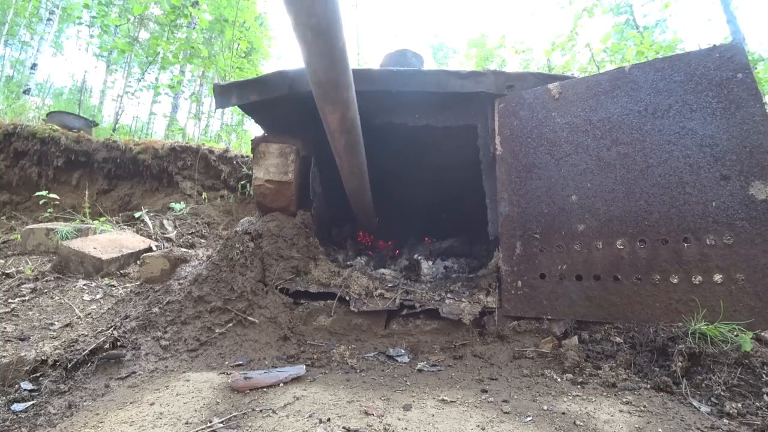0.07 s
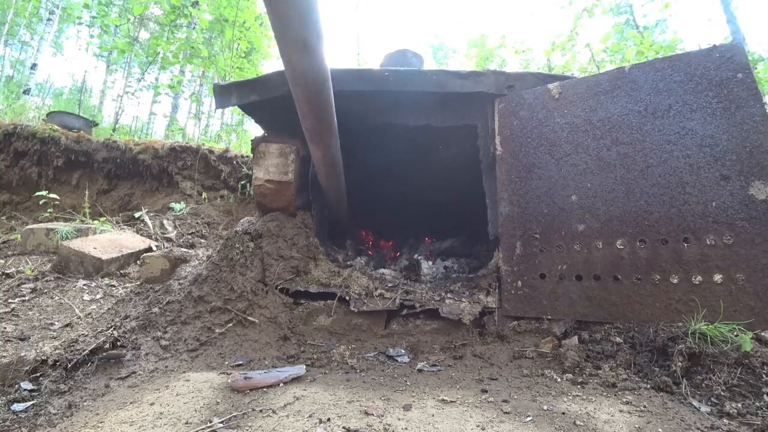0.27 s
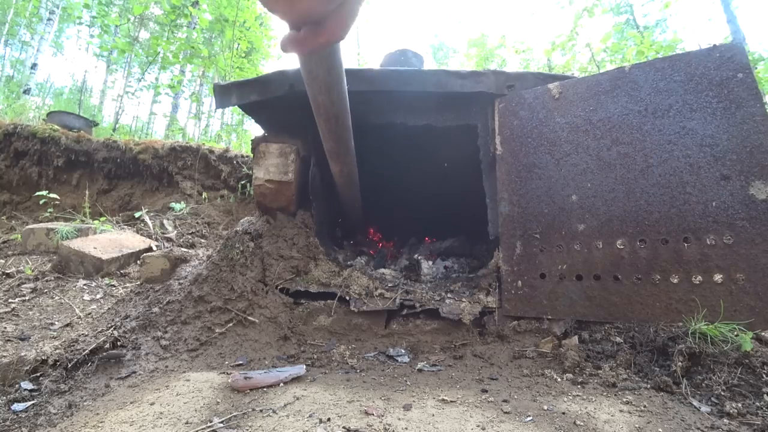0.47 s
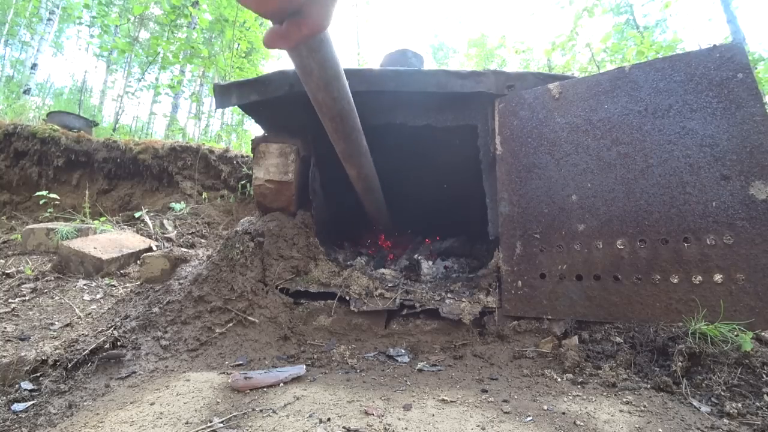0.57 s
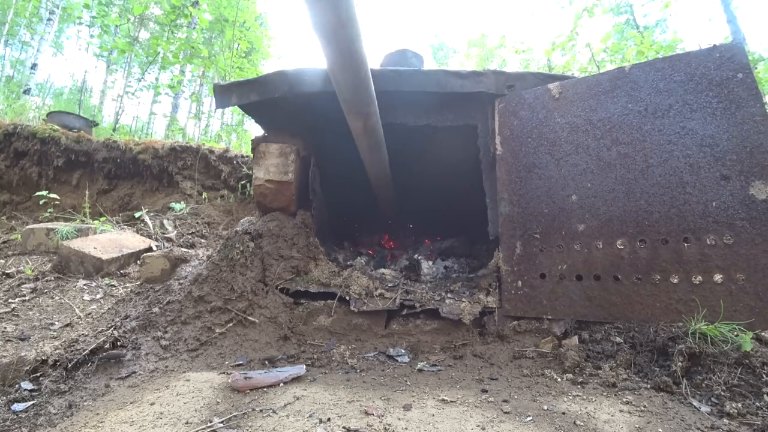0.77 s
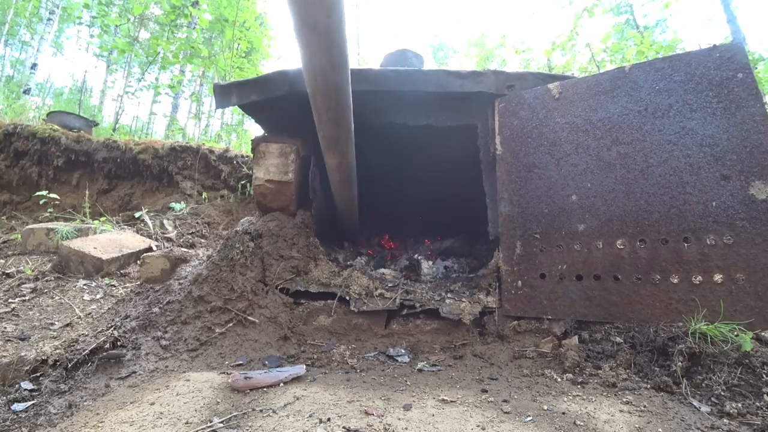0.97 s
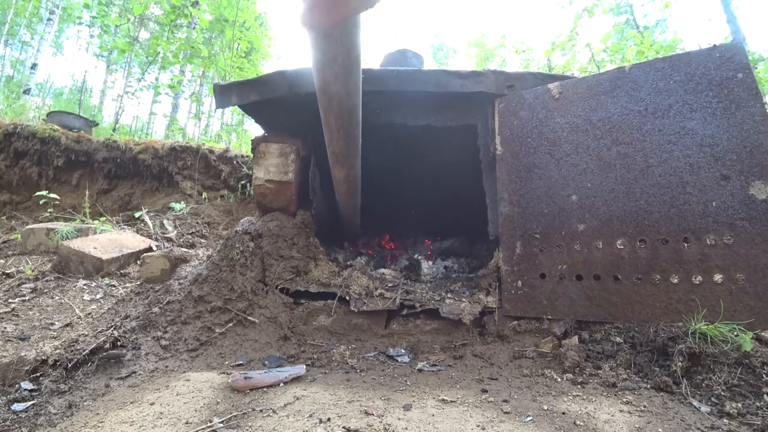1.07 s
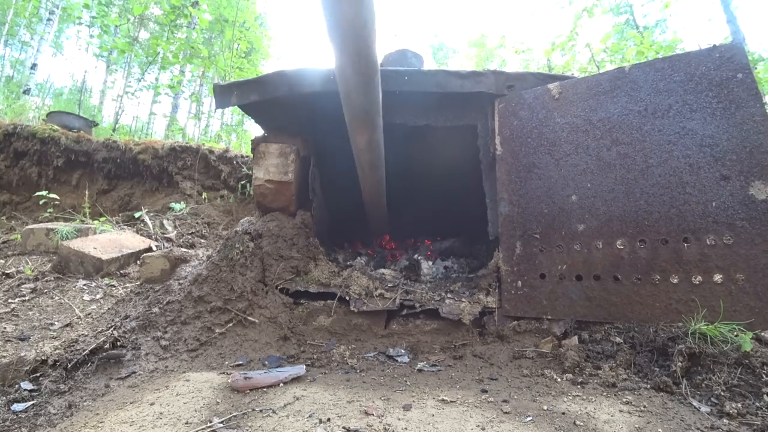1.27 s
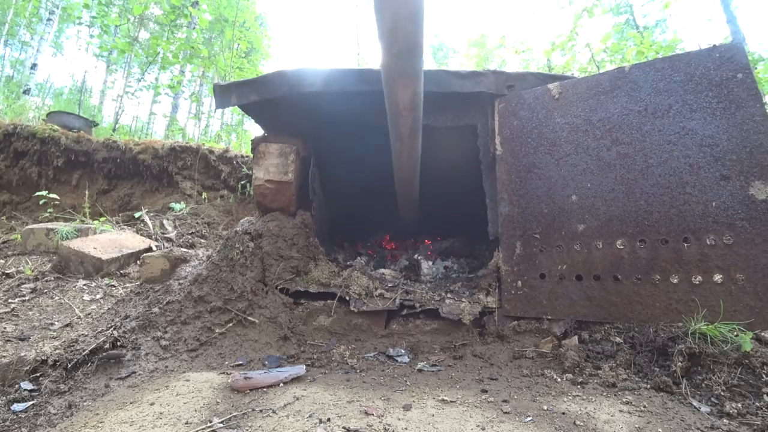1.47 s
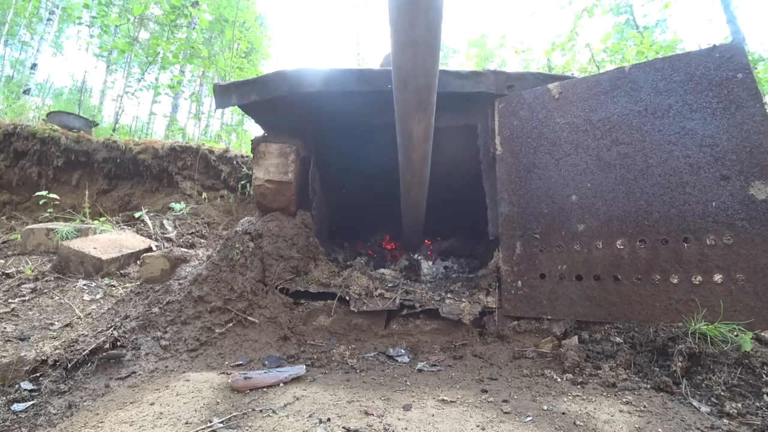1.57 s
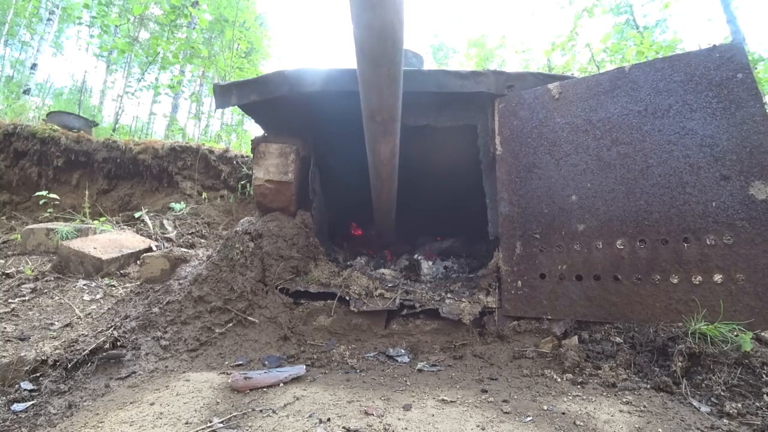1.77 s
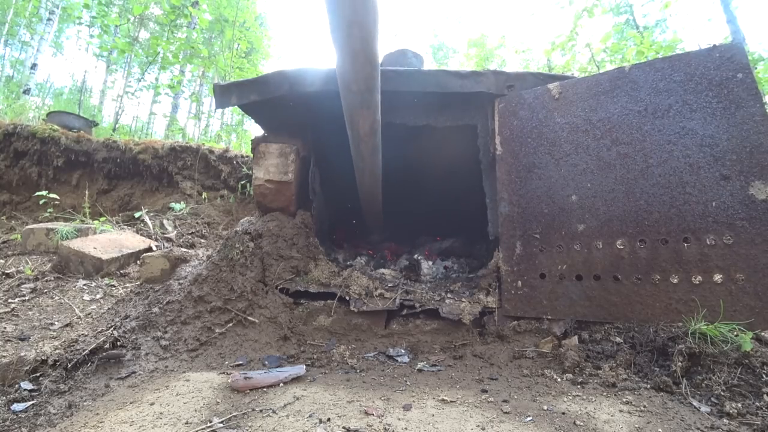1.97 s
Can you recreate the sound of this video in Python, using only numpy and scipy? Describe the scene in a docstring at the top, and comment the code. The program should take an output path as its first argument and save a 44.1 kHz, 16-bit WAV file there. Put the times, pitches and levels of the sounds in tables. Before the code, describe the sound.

Close, nearly centred raking of brittle charcoal with a metal blade, three strokes with low thuds, dull metallic ring and clacking lumps, while embers snap and grit trickles; quiet open forest air spreads around.

```python
"""Earth fire pit in a forest: a long-handled shovel rakes three times through the embers, under steady air noise.
Each stroke is random grit: shard resonances crunch, blade modes ring dully, pit modes rumble.
Knocks boom as decaying pit modes, lumps clack as damped sines, and grit trickles all the while.
Embers crackle during and between the strokes: clicks with an echo and a short noise tail."""
import sys
import numpy as np
from scipy import signal
from scipy.fft import rfft, irfft
from scipy.io import wavfile
from scipy.ndimage import uniform_filter1d

SR = 44100
rng = np.random.default_rng(int(sys.argv[2]) if len(sys.argv) > 2 else 0)


def materialize(psi):
    """Save the field psi as 16-bit PCM at rate SR to the path in sys.argv[1].

    A 1-D psi becomes a single channel; in a 2-D psi each row is a channel.
    """
    bounded = np.clip(np.atleast_2d(psi).T, -1, 1)
    quanta = np.round(bounded * 32767).astype(np.int16)
    wavfile.write(sys.argv[1], SR, quanta)


N = 88200  # samples: 2 s


def amp(db):
    """Turns dB into a linear gain."""
    return 10 ** (np.asarray(db) / 20)


def evened(x):
    """Scales a sound to an RMS of 1."""
    return x / np.sqrt(np.mean(x ** 2) + 1e-20)


def read(points, hz):
    """Reads a curve along a logarithmic frequency axis."""
    f, value = np.transpose(points)
    return np.interp(np.log(hz + 1), np.log(f + 1), value)


def add(mix, s, sound):
    """Lays a sound into the mix at s seconds, cut at the end of the mix."""
    part = mix[round(s * SR):][:len(sound)]
    part += sound[:len(part)]


def colour(x, points):
    """Filters by a gain curve in dB over frequency."""
    gain = amp(read(points, np.fft.rfftfreq(x.shape[-1], 1 / SR)))
    return irfft(rfft(x) * gain, x.shape[-1])


def ring(x, hz, width):
    """A two-pole resonance of gain 1 at its centre; width in Hz."""
    b, a = signal.iirpeak(min(hz, SR / 2.1), hz / max(width, 5), SR)
    return signal.lfilter(b, a, x)


def body(x, modes, factor):
    """Passes a force through all modes of an object, their pitches scaled by the factor."""
    return sum(amp(mode[2]) * ring(x, mode[0] * factor, mode[1]) for mode in modes)


def widen(mid, side, width):
    """Makes stereo: left is mid plus side, right is mid minus side."""
    side = colour(side, width)
    return np.array([mid + side, mid - side])


# Spectrum of the forest air (f/Hz, relative level/dB)
AIR_SPECTRUM = [(12, -20), (20, 7.5), (66, -1.5), (143, -17.5), (402, -12), (484, -15.5), (740, -15.5),
                (1290, -13.5), (2080, -20), (2380, -20.5), (7650, -28.5), (11400, -27.5), (14800, -72),
                (22000, -120)]
# Stereo spread of the air (f/Hz, side-to-mid level/dB)
AIR_SPREAD = [(60, -9), (220, 9.5), (830, 9), (3080, 5), (11400, 3.5)]
AIR_DB = -61  # RMS before widening


def forest_air():
    """Steady coloured noise, independent in mid and side."""
    air = amp(AIR_DB) * evened(colour(rng.standard_normal((2, N)), AIR_SPECTRUM))
    return widen(*air, AIR_SPREAD)


CLUMP_S = 0.0061  # length of each of the two smoothing passes


def clumps(count):
    """Quick random swells of unit RMS: noise smoothed twice."""
    span = max(round(CLUMP_S * SR), 2)
    smooth = uniform_filter1d(rng.standard_normal(count), span)
    return evened(uniform_filter1d(smooth, span))


GRAINS_PER_S, GRAIN_SPREAD_DB = 1500, 1.5
GRAIN_CLUMP_DB = 3.5  # RMS swell of each grain train


def grit(count):
    """Small fractures: sparse random impulses of uneven size that come in clumps."""
    hits = (rng.random(count) < GRAINS_PER_S / SR) * rng.standard_normal(count)
    size_db = GRAIN_SPREAD_DB * np.minimum(rng.exponential(1, count), 4)
    return evened(hits * amp(size_db + GRAIN_CLUMP_DB * clumps(count)))


SHARD_WIDE = 0.17  # resonance width over pitch
# Tone curve of breaking charcoal (f/Hz, relative level/dB)
CRUNCH_TONE = [(1180, -30), (2000, -10.5), (2740, -15), (2940, -8), (3530, -1.5), (5150, -0.5), (6050, 3.5),
               (10600, -1), (11200, 6), (11400, 5), (14800, -48), (22000, -120)]


def crunch(count):
    """Shards of many sizes break, each size ringing briefly at its own pitch."""
    shards = np.zeros(count)
    for hz in np.geomspace(2200, 11000, num=14):
        shard = evened(ring(grit(count), hz, SHARD_WIDE * hz))
        shards += shard * np.sqrt(hz)  # small shards are louder
    return evened(colour(shards, CRUNCH_TONE))


# Modes of the pit (f/Hz, width/Hz, relative level/dB, signed weight used by knocks only)
PIT_MODES = [(57.3, 26, -20.5, -2.1), (101.6, 14, 2.5, 0.16), (131.7, 20.4, 5, -0.84),
             (174.6, 17, -2, -0.24), (234.7, 33.5, -2, 0.95), (305, 29, -3, 0.85), (416, 41, -15, 0.67)]


def pit_rumble(count, factor):
    """Grit shakes the low modes of the pit into a rumble of unit RMS."""
    return evened(body(grit(count), PIT_MODES, factor))


# Loose charcoal slides and settles (t/s, treble level/dB, low level/dB)
SETTLING = [(0.0, -65.5, -62), (0.13, -68.5, -67.5), (0.22, -60, -57), (0.26, -42.5, -64),
            (0.34, -38, -47.5), (0.38, -43, -46.5), (0.47, -42.5, -47), (0.62, -44.5, -58),
            (0.78, -57, -56), (0.97, -65.5, -68), (1.1, -48.5, -59), (1.17, -51, -58.5), (1.34, -58, -62.5),
            (1.44, -66.5, -64.5), (1.6, -68.5, -69), (1.73, -47.5, -57), (1.81, -52.5, -61.5),
            (2.0, -58, -54.5)]


def settling():
    """Fine grit trickles and the bed shifts all the while."""
    s, treble_db, low_db = np.transpose(SETTLING)
    t = np.arange(N) / SR
    trickle = amp(np.interp(t, s, treble_db)) * crunch(N)
    return trickle + amp(np.interp(t, s, low_db)) * pit_rumble(N, 1)


CRACK_WIDE_HZ = 5940  # width of the crack resonance
CRACK_FLAT_DB = -12  # share of the unresonated burst
ECHO_S, ECHO_DB = .0012, -6.5


def crack(s, peak_db, hz, t60, snap, noise):
    """A sharp snap, its echo off the pit wall and a short splintering tail."""
    t, snap = np.arange(len(noise)) / SR, np.clip(snap, 0, 1)
    tail = noise * amp(-60 * t / max(t60, .004)) * np.minimum(t / .0003, 1)
    burst = (1 - snap) * tail
    burst[2] += snap * 4
    burst[2 + round(ECHO_S * SR)] += snap * 4 * amp(ECHO_DB)
    bright = ring(ring(burst, hz, CRACK_WIDE_HZ), hz, CRACK_WIDE_HZ)
    flat = burst - ring(burst, 250, 1800)  # the low part is taken out
    sound = bright + amp(CRACK_FLAT_DB) * flat
    return s, amp(peak_db) * sound / abs(sound).max()


# Embers that snap (t/s, peak level/dB, centre f/Hz, noise tail t60/s, share of clean snap 0-1)
EMBER_CRACKS = [(.1828, -24, 6700, .022, .75), (.9897, -17, 8100, .016, .8), (1.0172, -26, 8300, .02, .4),
                (1.0593, -21, 8500, .018, .75), (1.0623, -15.5, 7800, .024, .65),
                (1.2889, -34, 8800, .03, .4), (1.2944, -16.5, 8400, .024, .68),
                (1.6254, -20, 5200, .02, .75), (1.7175, -23, 8400, .02, .6),
                (0.0274, -39, 7600, 0.028, 0.59), (0.0456, -41, 9710, 0.026, 0.56),
                (0.0822, -50, 4330, 0.019, 0.26), (0.1022, -42.5, 7390, 0.022, 0.45),
                (0.1245, -31.5, 6570, 0.037, 0.58), (0.156, -34, 6400, 0.026, 0.61),
                (0.2508, -30, 7260, 0.022, 0.85), (0.2748, -32, 8440, 0.022, 0.8),
                (0.3062, -15, 5950, 0.042, 0.63), (0.3096, -21, 6200, 0.022, 0.85),
                (0.4448, -20, 5660, 0.036, 0.6), (0.4903, -21.5, 6330, 0.036, 0.5),
                (0.5464, -26, 7400, 0.022, 0.8), (0.606, -28, 5900, 0.018, 0.5),
                (0.6637, -21.5, 7000, 0.016, 0.69), (0.7342, -31, 8000, 0.019, 0.4),
                (0.748, -23, 9300, 0.015, 0.6), (0.766, -38, 8230, 0.025, 0.6),
                (0.778, -22.5, 5940, 0.02, 0.63), (0.8264, -47, 9920, 0.024, 0.9),
                (0.834, -19.5, 8540, 0.027, 0.57), (0.8713, -39, 8000, 0.022, 0.6),
                (0.889, -36, 7000, 0.02, 0.34), (0.9463, -28, 7160, 0.031, 0.5),
                (1.1372, -25, 7900, 0.022, 0.55), (1.1514, -42, 7230, 0.022, 0.8),
                (1.176, -27.5, 6100, 0.02, 0.6), (1.2043, -23, 8700, 0.022, 0.55),
                (1.2281, -30, 7530, 0.02, 0.6), (1.249, -44, 7500, 0.022, 0.8),
                (1.3095, -23.5, 7060, 0.022, 0.66), (1.3407, -37, 8000, 0.015, 0.65),
                (1.3752, -31, 7870, 0.022, 0.66), (1.3915, -27, 7700, 0.023, 0.59),
                (1.503, -32.5, 7700, 0.022, 0.54), (1.531, -30.5, 6560, 0.021, 0.6),
                (1.583, -42, 6620, 0.022, 0.6), (1.6794, -42, 8070, 0.022, 0.6),
                (1.715, -23.5, 7900, 0.02, 0.59), (1.788, -32, 6740, 0.017, 0.45),
                (1.8025, -32.5, 7400, 0.019, 0.55), (1.8099, -45, 5350, 0.022, 0.8),
                (1.8224, -42, 6930, 0.02, 1), (1.8517, -38, 8300, 0.022, 0.6),
                (1.8791, -28.5, 7960, 0.015, 0.7), (1.9033, -34, 9500, 0.022, 0.48),
                (1.929, -29.5, 6300, 0.022, 0.57), (1.934, -35, 8200, 0.039, 0.6),
                (1.9492, -23.5, 10400, 0.027, 0.6), (1.978, -49, 7750, 0.019, 0.9)]


def embers():
    """The embers snap one by one."""
    out = np.zeros(N)
    for row in EMBER_CRACKS:
        add(out, *crack(*row, rng.standard_normal(3000)))
    return out


RISE_S = 0.0019  # rise time constant of clacks and knocks
CLACK_T60_S = 0.028
# Lumps that clack against the blade (t/s, level before the soft rise/dB, f/Hz)
LUMP_CLACKS = [(0.297, -34, 446), (0.441, -36, 526), (0.491, -31, 717), (0.543, -35, 557),
               (0.774, -43.5, 517), (1.193, -34, 546), (1.603, -40, 520), (1.692, -40, 433),
               (1.903, -42.5, 519)]


def clacks():
    """Each lump gives a dull, quickly damped sine."""
    out = np.zeros(N)
    t = np.arange(0, .1, 1 / SR)
    for s, level_db, hz in LUMP_CLACKS:
        decay = amp(level_db - 60 * t / CLACK_T60_S)
        add(out, s, decay * np.sin(2 * np.pi * hz * t) * (1 - np.exp(-t / RISE_S)))
    return out


def knock(s, peak_db, factor):
    """One short push sets the pit booming: its modes decay, wide ones faster."""
    t = np.arange(0, .25, 1 / SR)
    boom = np.zeros(len(t))
    for hz, width, db, weight in PIT_MODES:
        decay = np.exp(-np.pi * width * t)
        boom += weight * amp(db) * decay * np.sin(2 * np.pi * hz * factor * t)
    boom *= 1 - np.exp(-t / RISE_S)
    return s, amp(peak_db) * boom / abs(boom).max()


# Blows of the blade on the pit floor (t/s, peak level/dB, pitch factor)
FLOOR_KNOCKS = [(0.209, -16, 1.025), (.441, -31.5, 0.91), (.546, -36, 1.113), (0.669, -46, 0.89),
                (0.775, -46.5, 0.81), (.957, -29.5, 0.87), (1.036, -38, 1.04), (1.170, -36.5, 0.908),
                (1.287, -47.5, 0.905), (1.602, -54, 0.9), (1.647, -40.5, 0.43), (1.903, -46.5, 0.97),
                (1.931, -45.5, 0.99)]


def knocks():
    """The blade bumps the pit floor, blow after blow."""
    out = np.zeros(N)
    for row in FLOOR_KNOCKS:
        add(out, *knock(*row))
    return out


# Modes of the shovel blade (f/Hz, width/Hz, relative level/dB)
BLADE_MODES = [(562, 260, -9.5), (1136, 37, 3), (1616, 135, -4.5), (2317, 31, 0.5), (2620, 78, -7),
               (2943, 64, -4), (3680, 54, -3)]


def blade_ring(force, load, wide_db):
    """The dragging force excites the loaded blade, with an unpitched scrape under the ring."""
    pitched = evened(body(force, BLADE_MODES, load))
    scrape = evened(ring(force, 1200, 1700))
    return evened(pitched + amp(wide_db) * scrape)


DRAG_CLUMP_DB = 0.5  # RMS swell shared by crunch and blade force


def stroke(table, load, wide_db):
    """The blade drags through charcoal: crunch, blade ring and pit rumble follow their level curves."""
    s, crunch_db, blade_db, pit_db = np.transpose(table)
    t = np.arange(s[0], s[-1], 1 / SR)
    count = len(t)
    drag = amp(DRAG_CLUMP_DB * clumps(count))
    force = drag * (grit(count) + grit(count))
    sound = amp(np.interp(t, s, blade_db)) * blade_ring(force, load, wide_db)
    sound += amp(np.interp(t, s, pit_db)) * pit_rumble(count, 0.88)
    sound += amp(np.interp(t, s, crunch_db)) * evened(drag * crunch(count))
    fade = np.clip(np.minimum((t - t[0]) / .003, (t[-1] - t) / .03), 0, 1)
    return s[0], fade * sound


# One table per stroke (t/s, crunch level/dB, blade ring level/dB, pit rumble level/dB)
RAKE_STROKES = [
    [(0.206, -31, -51, -28), (0.216, -26, -31.5, -28.5), (0.245, -41, -50, -41), (0.277, -35.5, -50, -44.5),
     (0.297, -41, -45, -43), (0.307, -30, -49.5, -42.5), (0.345, -42.5, -55, -52), (0.395, -48, -53, -47),
     (0.433, -39, -51, -46.5), (0.443, -41, -53, -39), (0.479, -45, -48.5, -48), (0.489, -37, -46.5, -44),
     (0.555, -32.5, -39.5, -39.5), (0.625, -41.5, -51, -50), (0.651, -77, -58, -59), (0.66, -44, -61, -57)],
    [(.953, -46, -60, -40), (.960, -31.5, -43, -39), (.978, -30.5, -50.5, -41), (.988, -44.5, -58, -40),
     (1.003, -50, -63, -55), (1.025, -41.5, -57, -45), (1.05, -48, -62, -45), (1.077, -50, -66, -50),
     (1.121, -50.5, -58.5, -53.5), (1.149, -46.5, -45, -51.5), (1.175, -42.5, -55, -45),
     (1.2, -40, -57.5, -52), (1.221, -59, -65, -53), (1.249, -48, -72, -75), (1.28, -52, -78, -62)],
    [(1.594, -72, -59, -48), (1.603, -42.5, -41.5, -48.5), (1.612, -39, -41.5, -42), (1.627, -39, -34, -41),
     (1.645, -40.5, -40.5, -47), (1.668, -45.5, -53.5, -50), (1.682, -46, -45.5, -48),
     (1.706, -42.5, -45.5, -55), (1.728, -52, -50, -49), (1.746, -48, -59, -49.5), (1.782, -59, -56, -53.5),
     (1.81, -44, -65, -56), (1.84, -68, -68, -61), (1.87, -62, -75, -72)],
]
# The load on the blade lowers its ring, one per stroke (pitch factor)
BLADE_LOAD = [.91, 0.82, 0.98]
# Unpitched scrape against the ring, one per stroke (relative level/dB)
BLADE_SCRAPE = [-1, -1, -5]


def raking():
    """The three strokes, the embers and the settling bed, with fresh random detail at each call."""
    out = embers() + settling()
    for row in zip(RAKE_STROKES, BLADE_LOAD, BLADE_SCRAPE):
        add(out, *stroke(*row))
    return out


# Stereo spread of the pit (f/Hz, side gain/dB)
PIT_SPREAD = [(60, -21), (140, -19.5), (350, -16.5), (830, -11.5), (1990, -11.5), (4770, -12.5),
              (11400, -15.5)]


def scene():
    """The pit close ahead, with knocks and clacks dead centre, and the forest air all around."""
    mid, side = raking(), raking()
    mid += knocks() + clacks()
    return forest_air() + widen(mid, side, PIT_SPREAD)


EDGE_HZ = 11020


def record(dry):
    """A steep low-pass takes off the top treble."""
    lowpass = signal.firwin(1001, EDGE_HZ, window=("kaiser", 7), fs=SR)
    return signal.oaconvolve(dry, lowpass[None], "same")


dry = scene()
out = record(dry)
materialize(out)
```